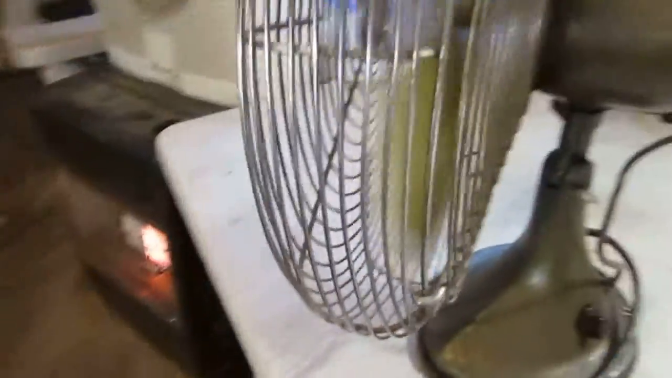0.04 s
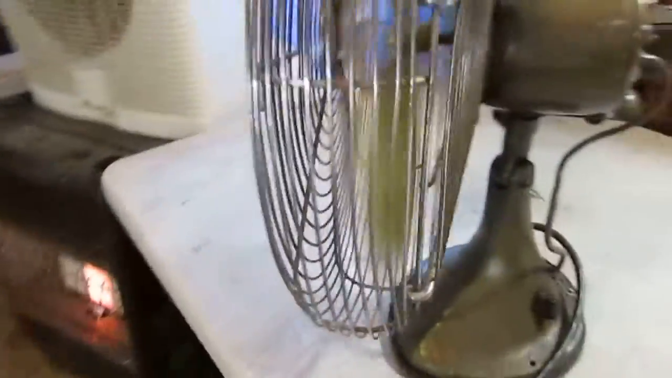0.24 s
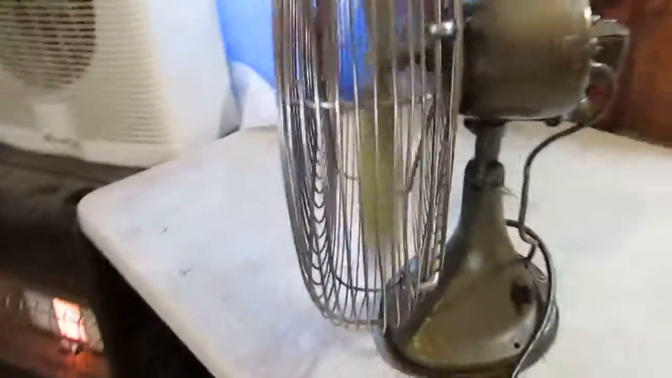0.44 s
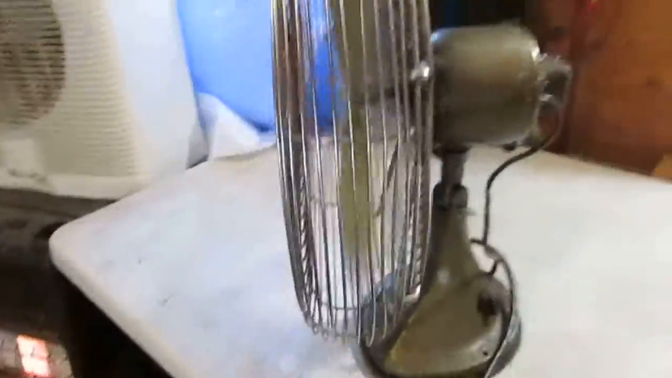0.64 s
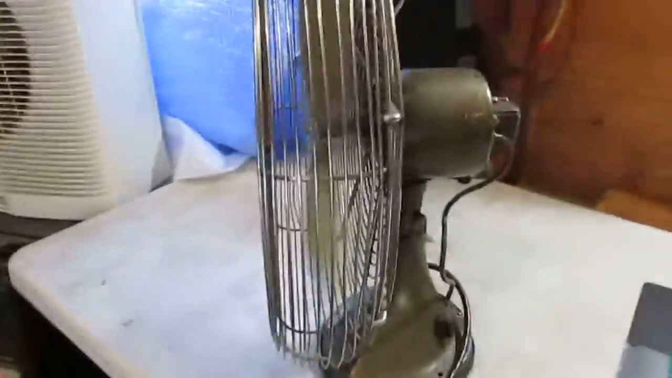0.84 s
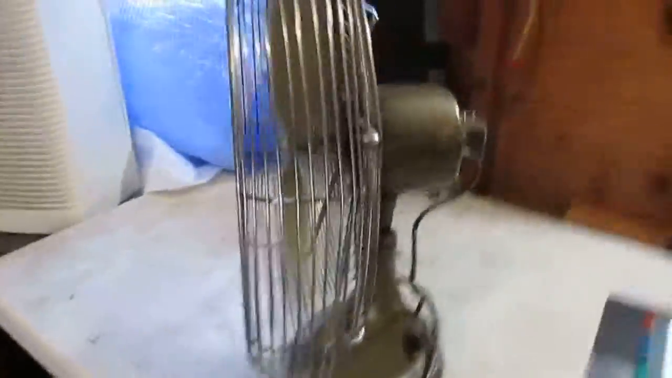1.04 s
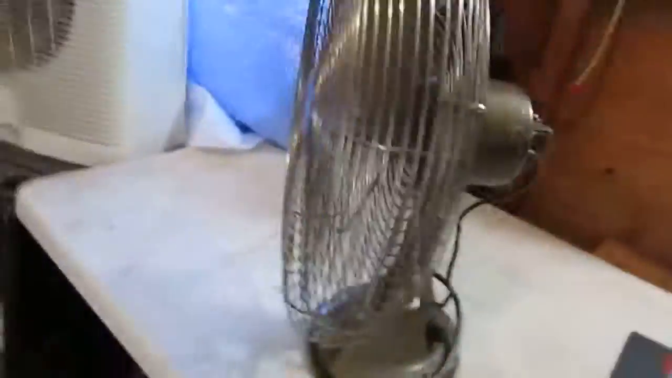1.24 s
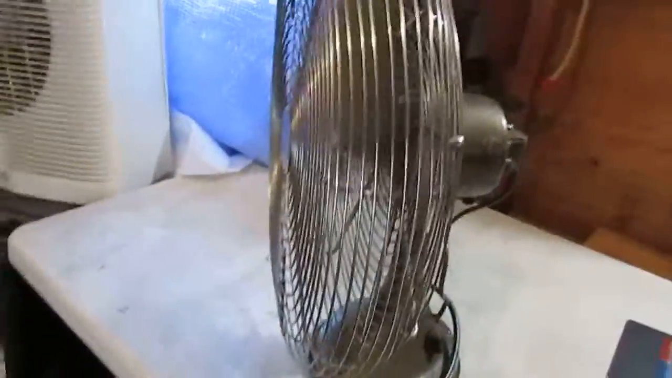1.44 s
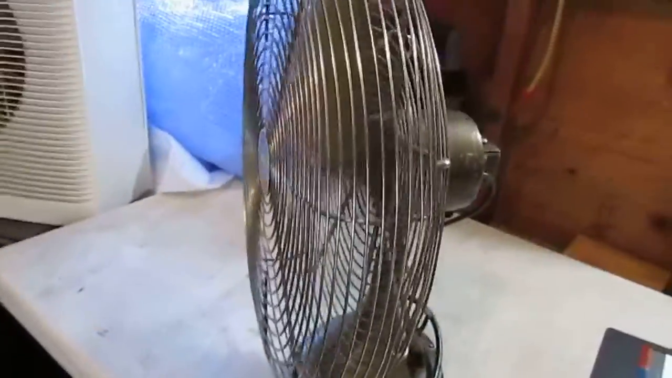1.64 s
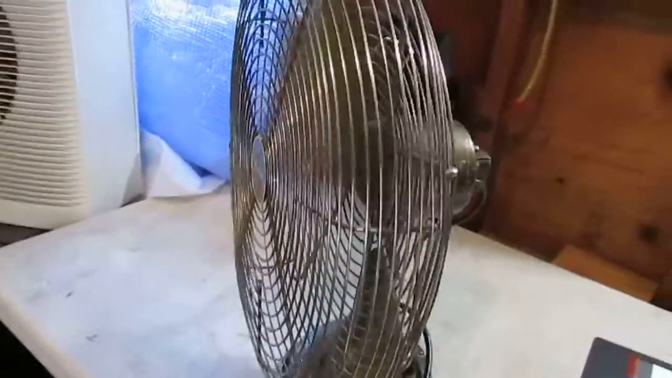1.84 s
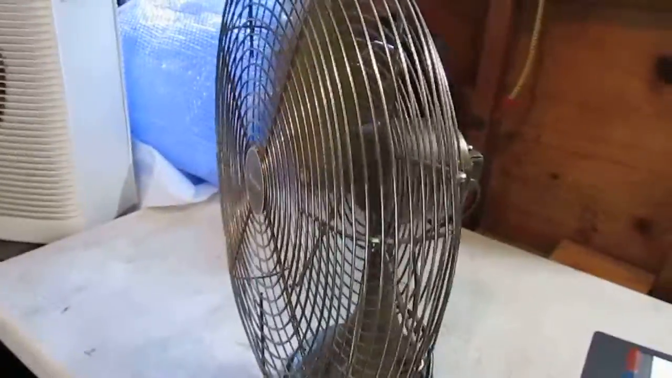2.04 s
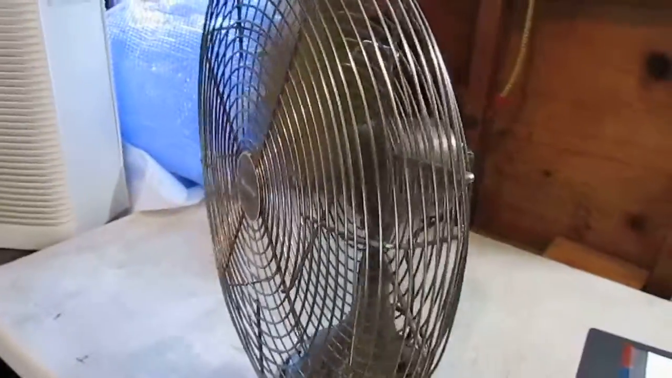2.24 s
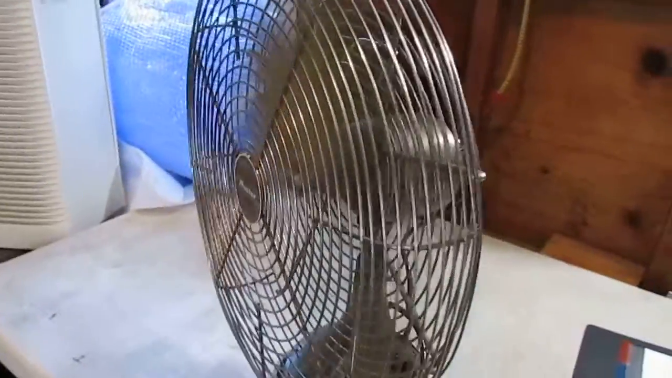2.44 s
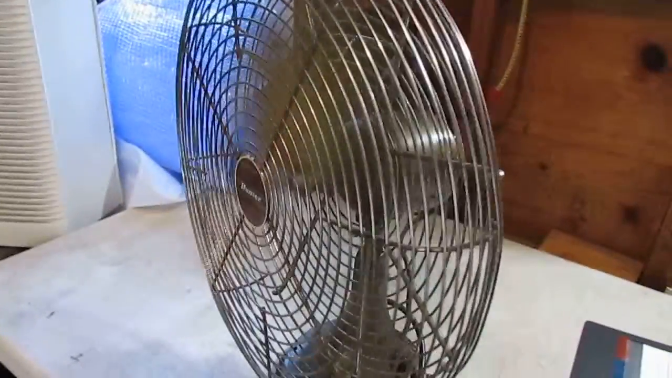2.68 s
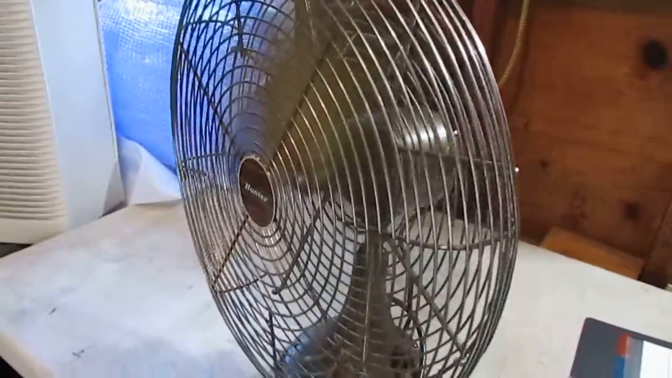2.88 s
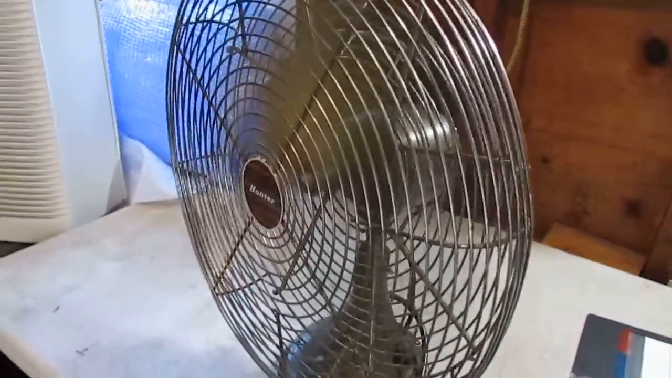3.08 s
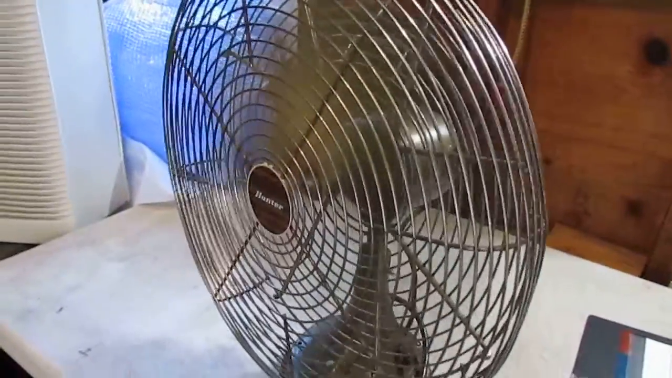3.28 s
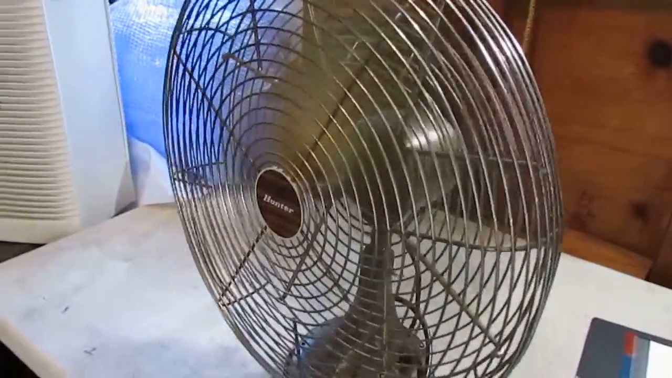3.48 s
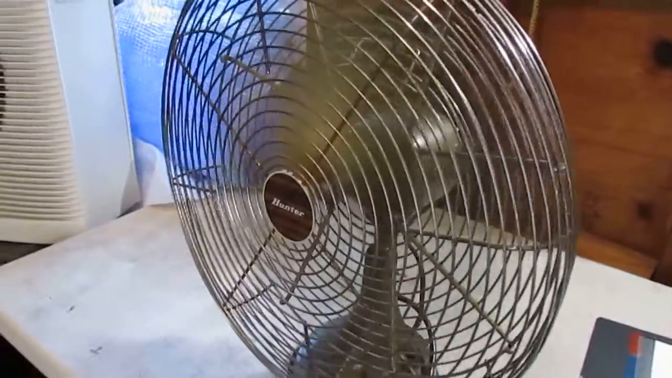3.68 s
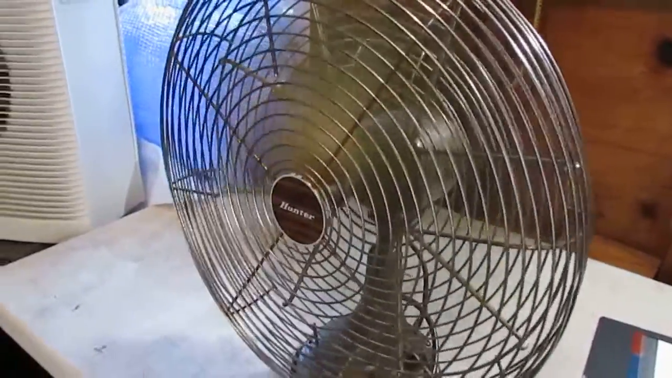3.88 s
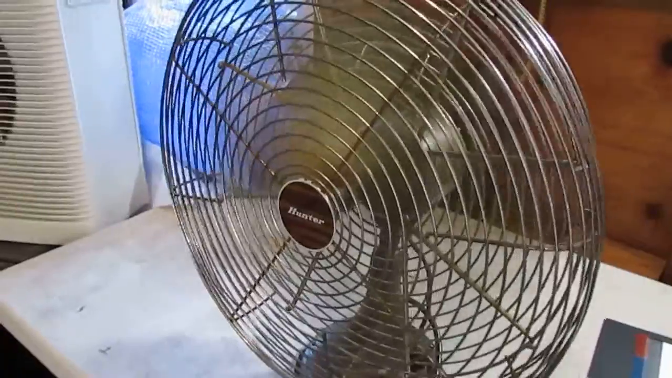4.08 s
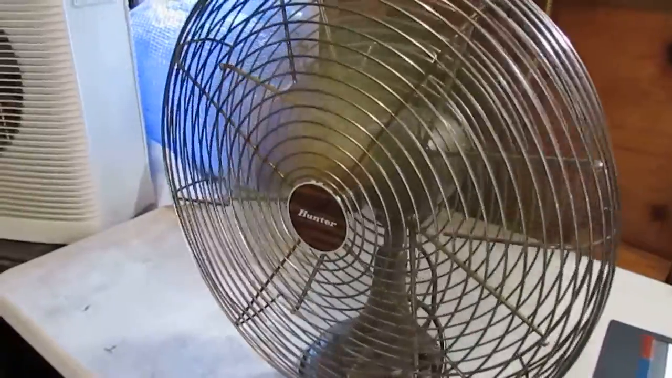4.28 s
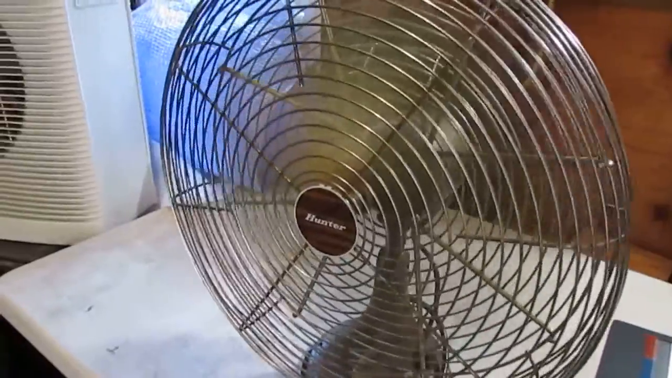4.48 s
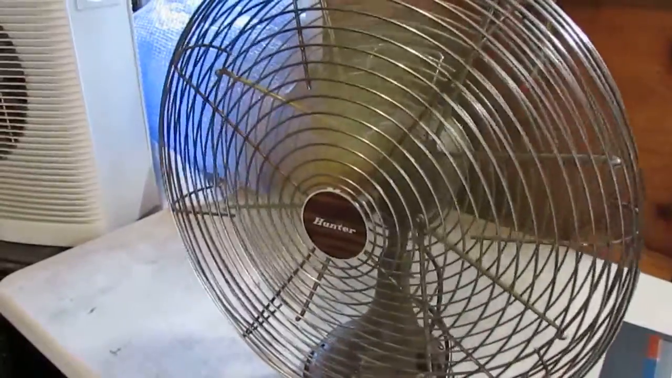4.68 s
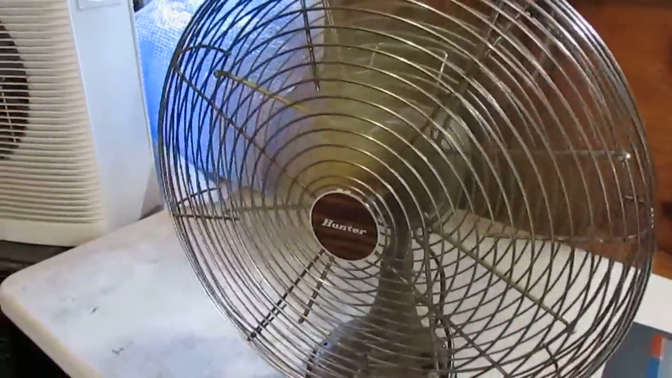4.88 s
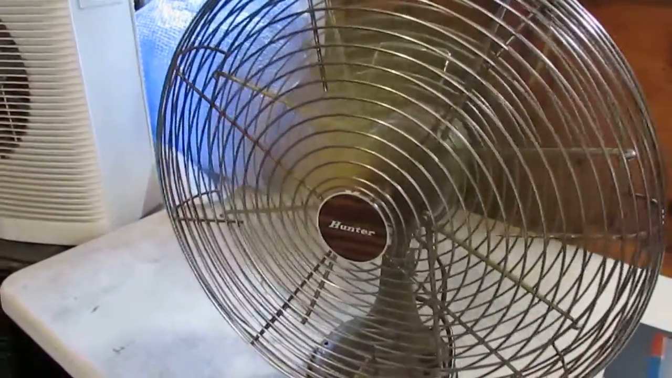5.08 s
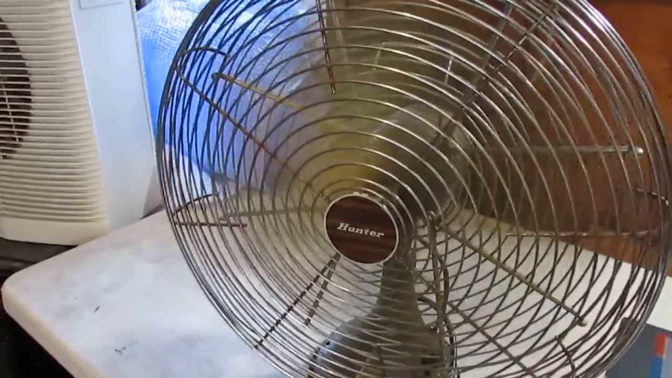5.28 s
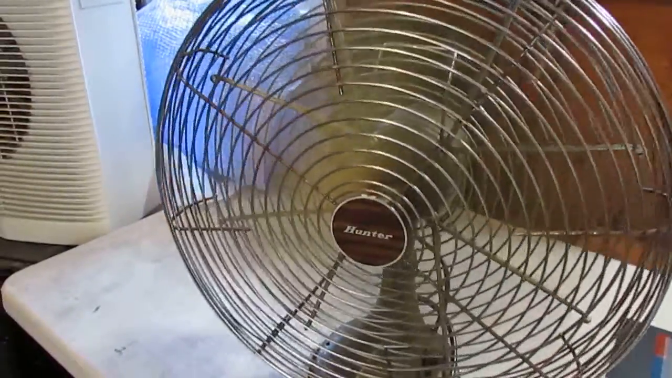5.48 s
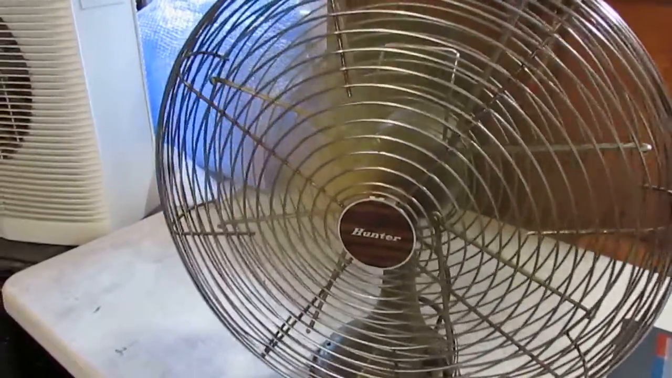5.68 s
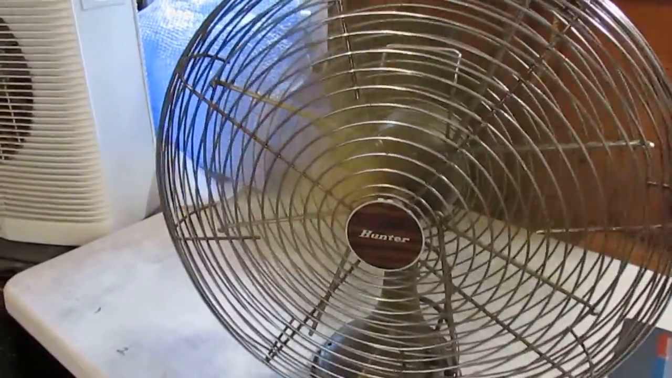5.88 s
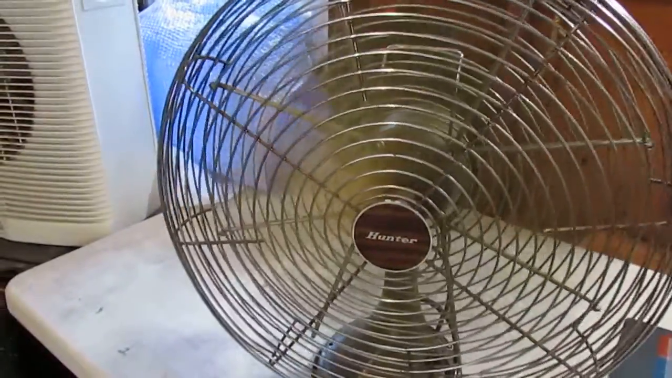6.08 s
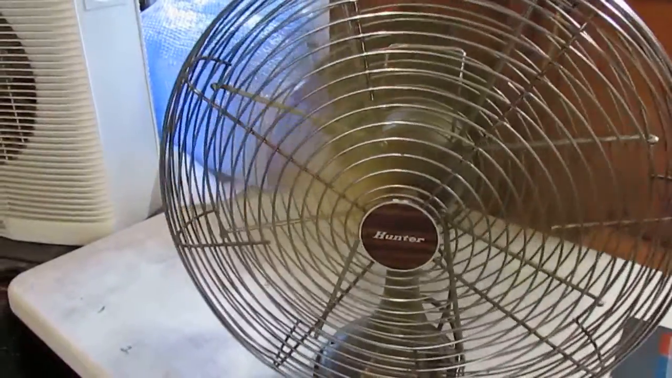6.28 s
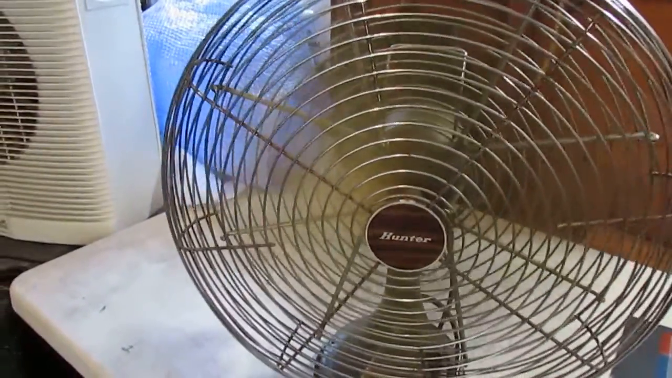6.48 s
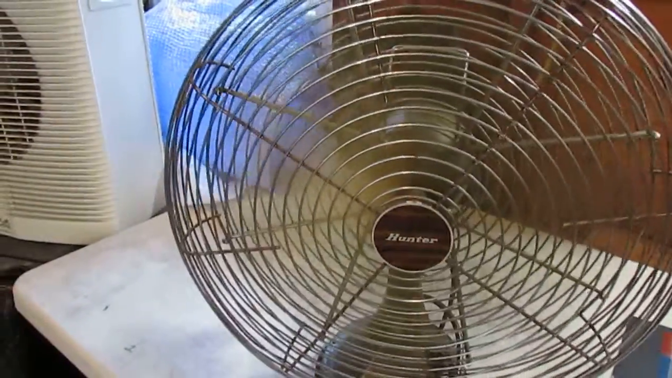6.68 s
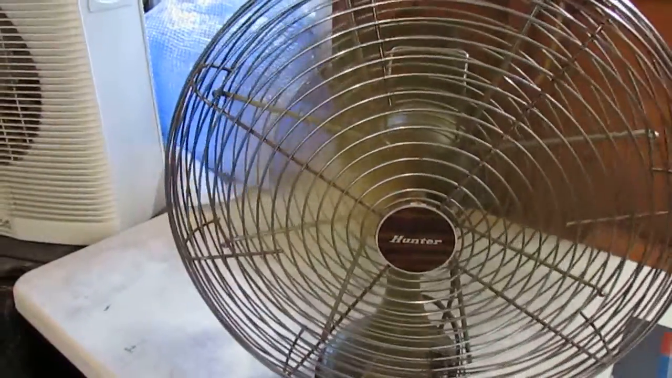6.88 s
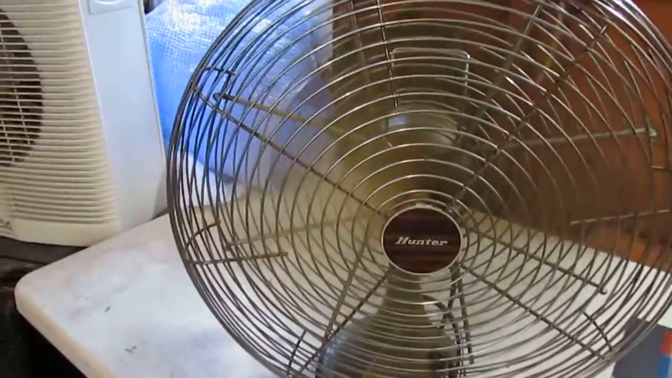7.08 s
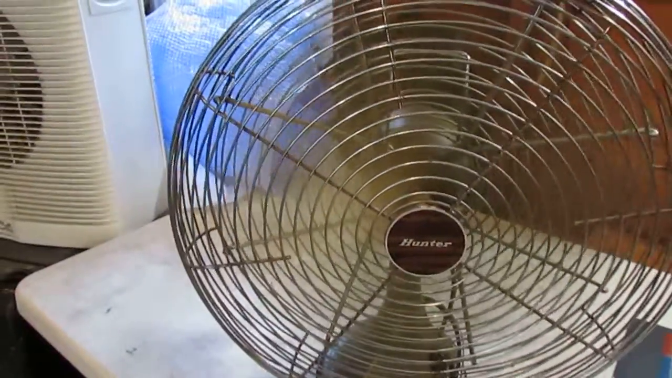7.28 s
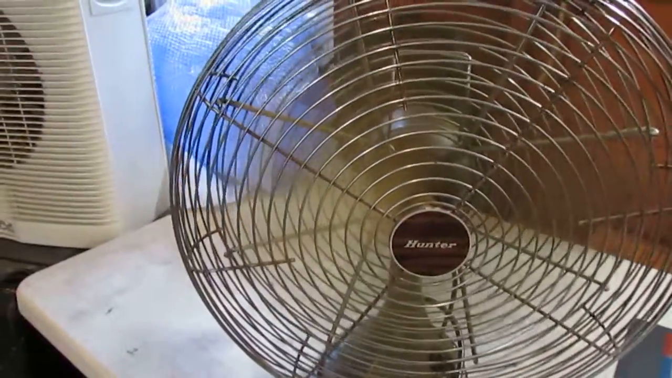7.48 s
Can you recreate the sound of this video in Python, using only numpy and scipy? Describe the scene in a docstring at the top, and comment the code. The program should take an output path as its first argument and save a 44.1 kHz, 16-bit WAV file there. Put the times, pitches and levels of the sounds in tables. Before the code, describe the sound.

A metal table fan drones dully, loud handling pops and ticks burst out, and the ducked hum and airflow slowly recover until gusts thud the microphone.

```python
"""A metal table fan, made of blade tones, motor hum and chopped noise, swings round towards a hand-held microphone.
A finger covers the port at first, so the fan is dull; it rubs, squeaks and lets go with loud suction pops.
The gain control ducks at the pops and takes seconds to recover, while the grip ticks and creeps (ringing clicks).
Hum and rushing air swell back, and at last the air stream buffets the microphone with lumps of low noise."""
import sys
import numpy as np
from scipy import signal
from scipy.fft import rfft, irfft
from scipy.io import wavfile
from scipy.ndimage import uniform_filter1d, minimum_filter1d

SR = 44100
rng = np.random.default_rng(int(sys.argv[2]) if len(sys.argv) > 2 else 0)


def put_to_file(sound):
    """Save the sound as 16-bit audio at rate SR, in the file named by the first command-line argument."""
    columns = np.atleast_2d(sound).T  # one column per channel
    safe = np.clip(columns, -1, 1)
    whole_steps = np.round(safe * 32767)
    wavfile.write(sys.argv[1], SR, whole_steps.astype(np.int16))


N = 332073
TIME = np.arange(N) / SR
POP_S = 0.82  # the port opens

# All levels stand ahead of the gain control; every width_s is the standard deviation of a bell-shaped pulse.
# motor hum (first row) and frame tones: pitch_hz, level_db (rms)
MOTOR_TONES = [(120.4, -30.5), (77.6, -54), (327.7, -48)]


def from_db(db):
    """Decibels to gain."""
    return 10 ** (np.asarray(db) / 20)


def rms_one(x):
    """Scale to unit rms."""
    return x / np.sqrt(np.mean(x ** 2) + 1e-20)


def bump(s, width):
    """A smooth bell-shaped pulse of height 1."""
    return np.exp(-0.5 * ((TIME - s) / width) ** 2)


def envelope(start, length, attack_s, release_s, db_per_s=0):
    """Straight attack, a hold that may swell, and an exponential release."""
    t = TIME - start
    attack = np.clip(t / attack_s, 0, 1)
    swell = from_db(db_per_s * np.clip(t, 0, length))
    return attack * swell * np.exp(-np.maximum(t - length, 0) / release_s)


def drift(rate):
    """Slow random wander of unit rms: straight lines between about 2 * rate random points per second."""
    knots = rng.standard_normal(int(2 * rate * N / SR) + 2)
    return rms_one(np.interp(TIME, np.linspace(0, TIME[-1], len(knots)), knots))


def slips(per_s, spread_db):
    """Random tiny stick-slip clicks of uneven size; rms 1."""
    clicks = (rng.random(N) < per_s / SR) * rng.standard_normal(N)
    return rms_one(clicks * from_db(spread_db * rng.standard_normal(N)))


def coloured(spectrum, source):
    """Shape a white source of unit rms to a spectrum in dB per Hz, falling away beyond both ends."""
    hz, db = np.transpose(spectrum)
    bins = np.maximum(np.fft.rfftfreq(N, 1 / SR), 1)
    shape = from_db(np.interp(np.log(bins), np.log(hz), db))
    shape *= np.minimum(bins / hz[0], 1) * np.minimum(hz[-1] / bins, 1) ** 2
    return irfft(rfft(source) * shape, N) * np.sqrt(SR / 2)


def noise(spectrum):
    """Smooth noise with the given spectrum."""
    return coloured(spectrum, rng.standard_normal(N))


def low_pass(x, hz, order=2):
    """Dull a sound above the given frequency."""
    return signal.sosfilt(signal.butter(order, hz, fs=SR, output="sos"), x)


def ring(x, hz, t60):
    """A unit click sets a sine of height 1 ringing, down 60 dB after t60 seconds."""
    r, w = from_db(-60 / (t60 * SR)), 2 * np.pi * hz / SR
    return signal.lfilter([0, np.sin(w)], [1, -2 * r * np.cos(w), r * r], x + 1e-18)


def resonances(modes, source):
    """A source rings modes of given width and rms level."""
    return sum(from_db(db) * rms_one(ring(source, hz, np.log(1000) / (np.pi * width)))
               for hz, width, db in modes)


def whine():
    """Thin electronic whine: two close steady tones beat in the high treble."""
    # whine tones: pitch_hz, level_db (rms)
    whine_tones = [(11763, -87.5), (11822, -71)]
    return np.sqrt(2) * sum(from_db(db) * np.sin(2 * np.pi * hz * TIME) for hz, db in whine_tones)


def covered_port(hum_db=-48, lumpy_db=0.5, throb=0.51, throb_low_hz=200, throb_high_hz=520):
    """Under the finger the fan is dull and throbs, and the closed port whistles faintly."""
    # dull sound under the finger: pitch_hz, level_db (per Hz)
    dull_colour = [(20, -65), (60, -54), (100, -68.5), (190, -73.5), (290, -66.5), (450, -72.5),
                   (640, -74.5), (730, -81.5), (1200, -90.5), (2500, -98), (4500, -102), (7000, -106),
                   (15000, -117)]
    # quarter-wave resonance of the closed port: pitch_hz, width_hz, level_db (rms)
    port_modes = [(3945, 10, -72.5)]
    throb_hz, crest_s = 25, 0.03  # rate, and the time of one crest
    hum = from_db(hum_db) * np.sqrt(2) * np.sin(2 * np.pi * MOTOR_TONES[0][0] * TIME)
    dull = noise(dull_colour) * from_db(lumpy_db * drift(23))
    band = signal.butter(2, [throb_low_hz, throb_high_hz], "band", fs=SR, output="sos")
    middle = signal.sosfiltfilt(band, dull)
    dull = dull + throb * middle * np.cos(2 * np.pi * throb_hz * (TIME - crest_s))
    return dull + resonances(port_modes, rng.standard_normal(N)) + hum


def squeak():
    """A narrow, hissy squeak: stick-slip of skin rings the rim of the port."""
    # squeak resonance: pitch_hz, width_hz, level_db (rms, before the stroke's gain)
    squeak_modes = [(7160, 200, -48.5)]
    return resonances(squeak_modes, slips(per_s=4600, spread_db=3.5))


def stroke(start, length, rub_db, friction_db, squeak_db, rub_edge_hz, rub, friction, squeal):
    """One slide of the finger: low rub, bright friction and squeak all swell as it presses harder."""
    attack_s, release_s = 0.021, 0.021
    # sound, gain in dB, rise in dB per s
    layers = [(low_pass(rub, rub_edge_hz, order=6), rub_db, 51.5),
              (friction, friction_db, 19.5),
              (squeal, squeak_db, 63)]
    return sum(sound * from_db(db) * envelope(start, length, attack_s, release_s, rise)
               for sound, db, rise in layers)


def knock(judder=0.06, judder_s=0.0022, squash=1.4):
    """The finger catches on the rim and judders; soft skin flattens the first swings."""
    # catches of the finger: start_s, level_db (ceiling of the flattened swings)
    catches = [(0.6868, -3)]
    # modes of the knock: pitch_hz, level_db (relative), t60_s
    knock_modes = [(430, 1, 0.0072), (726, 0, 0.0072), (965, -6.5, 0.011), (2320, -16, 0.0051)]
    out, t = np.zeros(N), np.arange(SR // 20) / SR
    for s, level_db in catches:
        touch = (t == 0) + judder * rng.standard_normal(len(t)) * np.exp(-t / judder_s)
        blow = sum((-1) ** k * from_db(db) * ring(touch, hz, t60)
                   for k, (hz, db, t60) in enumerate(knock_modes))
        start = round(s * SR)
        out[start:start + len(t)] += from_db(level_db) * np.tanh(squash * blow / np.abs(blow).max())
    return out


def finger(rebound_lag=2.76, bluntness=2.03, muffle_hz=11500):
    """The finger rubs across the port, squeaks, chatters, and lets go in a string of suction pops."""
    # colours before the strokes' gains: pitch_hz, level_db (per Hz; friction is then cut by 3 dB)
    rub_colour = [(30, -60), (200, -63.5), (320, -56), (450, -56), (650, -58.5), (900, -68), (1500, -87),
                  (3000, -100)]
    friction_colour = [(400, -80), (900, -58), (2000, -66), (2600, -74.5), (3200, -76.5), (4500, -81),
                       (5700, -93.5), (6500, -81), (7150, -89), (7900, -77), (10000, -101), (15000, -114)]
    # case under the sliding finger, then the chattering one: pitch_hz, width_hz, level_db (rms before gains)
    case_modes = [(1050, 180, -47), (2010, 53, -44.5), (3140, 200, -44.5), (6930, 400, -49)]
    chatter_modes = [(1300, 500, -29), (2300, 470, -31.5), (3760, 200, -42)]
    # strokes: start_s, length_s, rub_db, friction_db, squeak_db (gains), rub_edge_hz
    strokes = [(0.49, 0.16, -3.5, -6, -8, 950), (0.68, 0.024, 4, -3.5, -25, 800),
               (0.713, 0.088, 5.5, -7.5, -22, 530)]
    # chatter after the catch and at the release: centre_s, gain_db, width_s
    chatters = [(0.69, 1.5, 0.003), (.702, -2.5, 0.0052), (0.713, 1.5, 0.0021), (0.811, 9, 0.0018),
                (0.819, 9, 0.0013)]
    # pressure pops as the port is unsealed: centre_s, level_db (ceiling), width_s, rebound (share)
    pop_rows = [(0.8034, -0.5, 0.0015, 0.9), (0.8122, 6, 0.00051, .9), (0.8177, 3, 0.000085, 0.18),
                (0.82, 40, 0.00021, 0.38), (0.8263, 28, 0.00148, .1), (0.841, 3, 0.0073, 0.083)]
    skin = slips(per_s=5500, spread_db=4)
    friction = from_db(-3.0) * noise(friction_colour) + resonances(case_modes, skin)
    sources = noise(rub_colour), friction, squeak()
    slide = sum(stroke(*row, *sources) for row in strokes)
    bursts = sum(from_db(db) * bump(s, width) for s, db, width in chatters)
    chatter = bursts * resonances(chatter_modes, skin)
    # each pull is followed by a smaller rebound, and the diaphragm blunts the peaks
    pops = sum(from_db(db) * np.tanh(bluntness * (share * bump(s + rebound_lag * width, width) - bump(s, width)))
               for s, db, width, share in pop_rows)
    return low_pass(slide + chatter, muffle_hz) + knock() + pops


def grip(crunch=0.42, crunch_s=0.00096, body_below_hz=5000):
    """Dry ticks ring the housing, and skin creeps on it in short slides of fine crackle."""
    # ticks of the grip: start_s, peak_db, body_db (added to modes below body_below_hz)
    ticks = [(.9975, 10, -18), (1.004, 4, -13), (1.068, 15, 2.5), (1.082, 6.5, 2), (1.093, 9, 3),
             (1.099, 13, -1), (1.118, 6, -2), (1.120, 8.5, 1), (1.1375, 9.5, 1), (1.176, -8, -6)]
    # modes of the housing: pitch_hz, level_db (relative), t60_s
    housing = [(1170, -15, 0.036), (1970, -2.5, 0.0033), (3800, -7, .002), (6900, -4, .005),
               (7880, 8.5, .004), (9700, -1, 0.0039), (12500, -19, .002)]
    # slides of the skin: start_s, length_s, level_db (rms)
    creeps = [(0.82, 0.0058, 2), (0.848, 0.013, -21), (0.988, 0.066, -19), (1.067, 0.017, -9.5),
              (1.18, .018, -26)]
    # colour of the creep: pitch_hz, level_db (relative)
    creep_colour = [(800, -2.5), (3000, -13), (5800, -9), (7200, -0.5), (9000, -8), (12000, -19),
                    (16000, -26)]
    attack_s, release_s = 0.005, 0.012
    out, t = np.zeros(N), np.arange(SR // 20) / SR
    for s, db, body_db in ticks:
        touch = (t == 0) + crunch * rng.standard_normal(len(t)) * np.exp(-t / crunch_s)
        tick = sum(from_db(level + body_db * (hz < body_below_hz)) * ring(touch, hz, t60)
                   for hz, level, t60 in housing)
        start = round(s * SR)
        out[start:start + len(t)] += from_db(db) * tick / np.abs(tick).max()
    creep = sum(from_db(db) * envelope(s, length, attack_s, release_s) for s, length, db in creeps)
    return out + creep * rms_one(coloured(creep_colour, slips(per_s=2300, spread_db=1.0)))


def turned_deg():
    """How far the fan has turned from edge-on, at a steady rate."""
    edge_on_s, swing_deg_per_s = 1.14, 14.54
    return swing_deg_per_s * (TIME - edge_on_s)


def off_axis_deg():
    """Angle between the air stream and the microphone."""
    return np.abs(90 - turned_deg())


def fan(chop=0.16, flutter_db=0.5, tone_waver_db=1.17, phase_waver=0.0091, hum_waver_db=0.5):
    """Blade tones, motor hum, air chopped by the blades, and hiss from the grille; the swing sets their levels."""
    # blade tones before the swing's gain: multiple (of the blade rate), level_db (rms)
    blade_tones = [(1, -52), (2, -46.5), (3, -33.5), (4, -46), (5, -41), (6, -45), (7, -53), (10, -44.5),
                   (11, -43), (12, -47), (13, -42.5), (14, -52), (18, -47.5), (22, -46), (23, -49.5)]
    # air through blades and cage, then hiss of the grille wires: pitch_hz, level_db (per Hz, before the swing)
    rush_colour = [(30, -105), (100, -71), (350, -67.5), (510, -65), (660, -60), (860, -60), (1050, -65),
                   (1450, -62.5), (2200, -66), (3000, -70), (4200, -76.5), (7000, -83.5), (12000, -90.5),
                   (15500, -102)]
    grille_colour = [(3800, -100), (4700, -73.5), (5300, -69.5), (5800, -76), (6600, -99.5), (8000, -115)]
    # motor hum as the motor swings round: time_s, gain_db
    hum_curve = [(.85, 4), (2.3, 1), (3.5, -0.5), (5.3, 1.1), (5.9, -1.6), (6.85, 2), (7.53, -1)]
    blade_hz, wander = 63.6, 0.0008  # blade passing rate and its slow wander (share)
    spurt_s, spurt_width_s, spurt_share = 6.3, 0.28, 0.015  # the blades run briefly faster
    edge_lobe_deg, front_lobe_deg = 11.8, 4.7  # standard deviations
    edge = np.exp(-0.5 * (turned_deg() / edge_lobe_deg) ** 2)  # blade tips nearest
    front = np.exp(-0.5 * (off_axis_deg() / front_lobe_deg) ** 2)  # straight ahead
    # dB: level between the lobes, then what each lobe adds
    rush = from_db(0.15 + 4 * edge + 4 * front)
    hiss = from_db(-0.64 + 7.5 * edge + 4 * front)
    blades = from_db(-2.5 * edge + 3.5 * front)
    hum_s, hum_db = np.transpose(hum_curve)
    hum = from_db(np.interp(TIME, hum_s, hum_db))
    speed = 1 + wander * drift(0.97) + spurt_share * bump(spurt_s, spurt_width_s)
    turn = 2 * np.pi * np.cumsum(blade_hz * speed) / SR
    # turbulent inflow makes each blade tone waver, the higher ones more in phase
    tones = 0
    for k, db in blade_tones:
        phase = k * (turn + phase_waver * drift(6)) + rng.uniform(0, 2 * np.pi)
        tones = tones + from_db(db + tone_waver_db * drift(5.4)) * np.sin(phase)
    # the motor's hum follows the swing; the frame's tones do not
    motor, *frame = [from_db(db + hum_waver_db * drift(3.2)) * np.sin(2 * np.pi * hz * TIME)
                     for hz, db in MOTOR_TONES]
    # the lower part of the rush pulses as the blades pass
    air = noise(rush_colour) * from_db(flutter_db * drift(14))
    low = signal.sosfiltfilt(signal.butter(2, 1600, fs=SR, output="sos"), air)
    air = air + chop * low * (np.cos(2 * turn) + 0.5 * np.cos(turn) + 0.5 * np.cos(3 * turn))
    steady_tones = np.sqrt(2) * (blades * tones + hum * motor + sum(frame))
    return rush * air + hiss * noise(grille_colour) + steady_tones


def hand(jolt_db=42, settle_s=0.013):
    """Low rumble of the hand that carries the microphone; it jolts as the finger lets go, and later comes to rest."""
    # colour of the rumble before its level: pitch_hz, level_db (per Hz)
    hand_colour = [(20, -82), (45, -69), (62, -49.5), (80, -71), (130, -90)]
    rumble_db, rest_s, fade_db_per_s = -0.5, 2.3, 16
    level = from_db(rumble_db - fade_db_per_s * np.maximum(TIME - rest_s, 0))
    jolt = from_db(jolt_db) * np.exp(-np.abs(TIME - POP_S) / settle_s)
    return (level + jolt) * noise(hand_colour)


def eddy(s, peak_db, width, low_hz, high_hz, tilt_hz=380, edge=0.93, round_off=0.55):
    """A short lump of turbulent pressure with a set peak: heavy in the bass, falling steeply above its upper edge."""
    t = np.arange(-SR // 8, SR // 8) / SR
    band = signal.butter(2, [low_hz, edge * high_hz], "band", fs=SR, output="sos")
    swirl = signal.sosfilt(band, rng.standard_normal(len(t)))
    swirl = low_pass(swirl, tilt_hz, order=1)
    lump = np.tanh(round_off * rms_one(swirl)) * np.exp(-0.5 * (t / width) ** 2)
    lump = signal.sosfiltfilt(signal.butter(2, 1450, fs=SR, output="sos"), lump)
    return np.interp(TIME, s + t, from_db(peak_db) * lump / np.abs(lump).max(), left=0, right=0)


def wind(lumpy_db=0.5, gust_low_hz=125):
    """The air stream turns onto the microphone: growing rumble, and single eddies that thump."""
    # eddies striking the microphone: centre_s, peak_db, width_s, upper_edge_hz (nominal)
    gusts = [(5.94, -30, 0.04, 183), (6.38, -23.5, 0.046, 202), (6.464, -10.5, 0.0023, 450),
             (6.49, -12, 0.0068, 442), (6.505, 2, 0.0038, 507), (6.516, 6.5, 0.0012, 745),
             (6.532, -11, 0.0029, 500), (6.646, 1, 0.0054, 560), (6.671, -5, 0.011, 365),
             (6.856, -1, 0.0022, 600), (6.867, 9.5, 0.0018, 855), (6.924, 1, 0.0068, 504),
             (7.025, -2.5, 0.0084, 440), (7.052, -11, 0.0095, 430), (7.179, -15, 0.013, 384),
             (7.397, -3.5, 0.013, 340), (7.44, 2, 0.0073, 342), (7.526, -10, 0.0045, 350)]
    # colour of the rumble before its level: pitch_hz, level_db (per Hz)
    wind_colour = [(15, -62), (45, -55.5), (150, -54), (300, -67.5), (600, -79), (1500, -111)]
    axis_db, loss_db_per_deg = 7.5, 0.8  # gain on the axis of the stream, and its loss to the side
    # each eddy brings a swell of rumble, in proportion to its width; wake_db holds at wake_eddy_s
    wake_db, wake_width_s, wake_eddy_s = 10.5, 0.031, 0.0057
    stream = from_db(axis_db - loss_db_per_deg * off_axis_deg())
    wakes = sum((from_db(db + wake_db) * width / wake_eddy_s * bump(s, wake_width_s)) ** 2
                for s, db, width, _ in gusts)
    rumble = np.sqrt(stream ** 2 + wakes) * noise(wind_colour) * from_db(lumpy_db * drift(12))
    return rumble + sum(eddy(s, db, width, gust_low_hz, hz) for s, db, width, hz in gusts)


def scene():
    """The fan is heard in full once the port is open."""
    opened = np.clip((TIME - POP_S) / 0.01, 0, 1)
    covered = np.clip((POP_S - TIME) / 0.02, 0, 1)
    at_microphone = whine() + covered * covered_port() + finger() + grip()
    return (at_microphone + opened * (fan() + hand() + wind()))[None]


def gain_control(x, ceiling=0.92, recovery_per_s=0.19):
    """A peak over the ceiling pulls the gain down within a millisecond; its square root climbs back at a steady rate."""
    allowed = np.sqrt(ceiling / np.maximum(np.abs(x), ceiling))
    climb = recovery_per_s * TIME
    held = np.minimum.accumulate(allowed - climb, axis=-1) + climb
    return x * uniform_filter1d(minimum_filter1d(held, size=25), size=25) ** 2


def record(dry):
    """The port cancels one narrow band, gain control rides the level, the top is cut."""
    port_notch_hz, cutoff_hz = 7880, 15700
    heard = signal.lfilter(*signal.iirnotch(port_notch_hz, 22, fs=SR), dry)
    top_cut = signal.ellip(10, 0.1, 80, cutoff_hz, fs=SR, output="sos")
    return signal.sosfilt(top_cut, gain_control(heard))


dry = scene()
out = record(dry)
put_to_file(out)
```